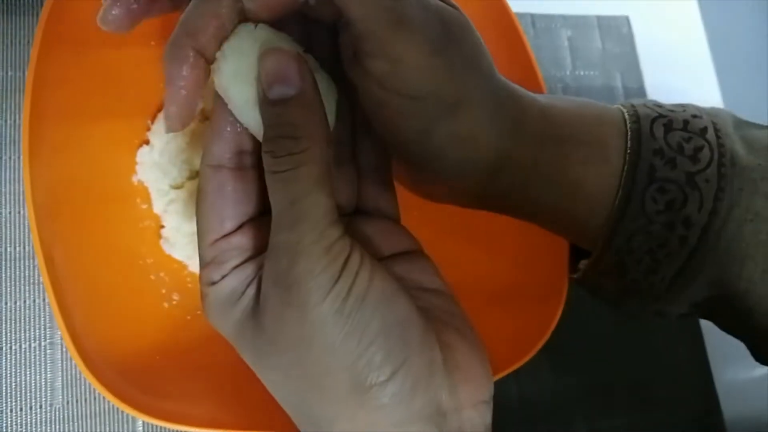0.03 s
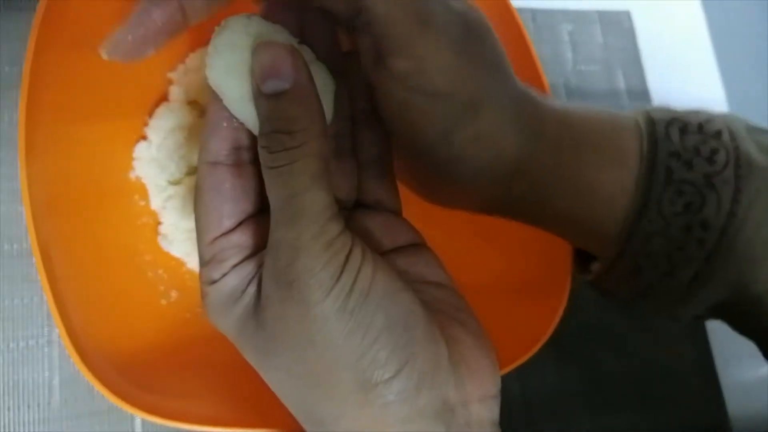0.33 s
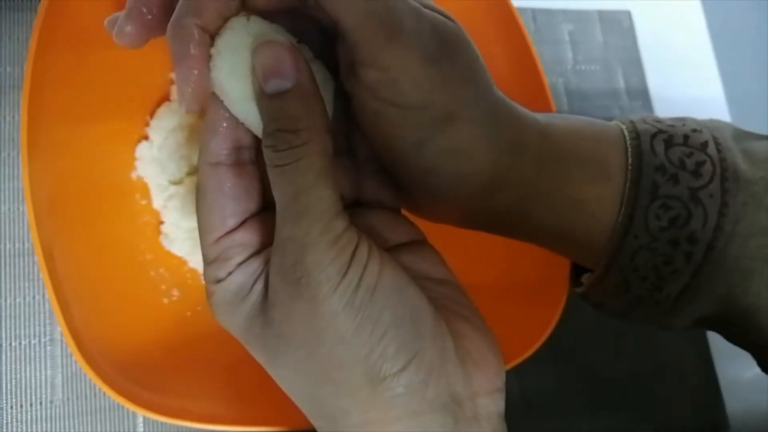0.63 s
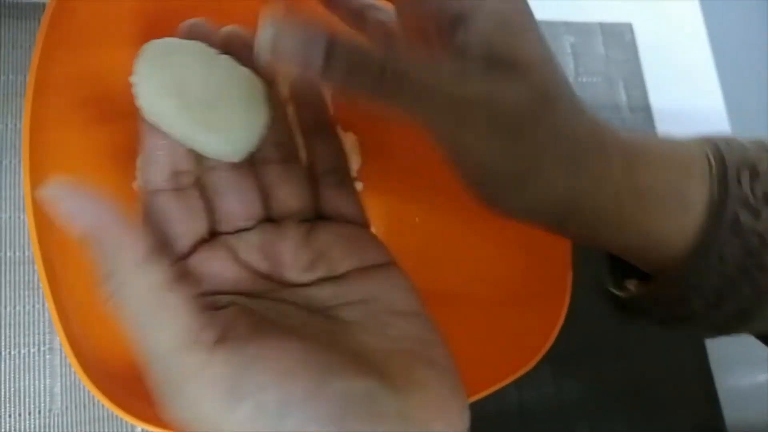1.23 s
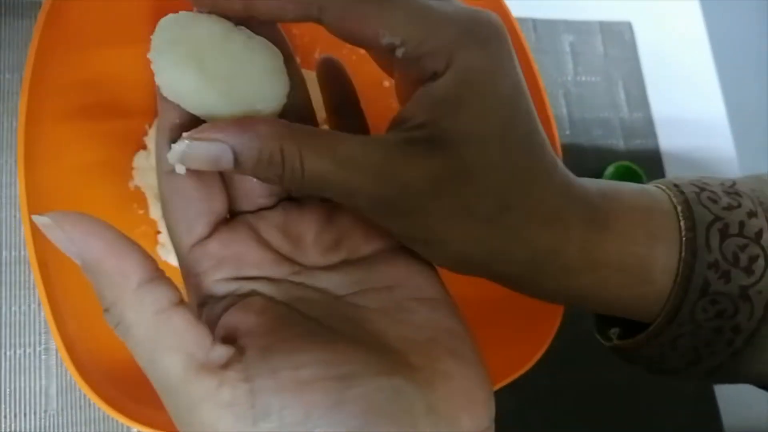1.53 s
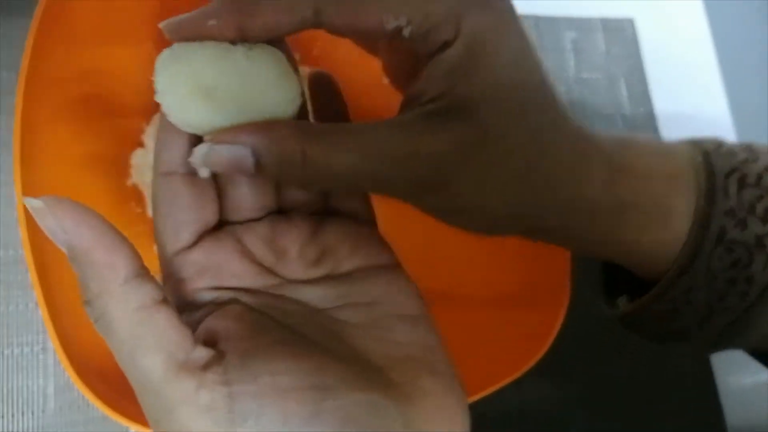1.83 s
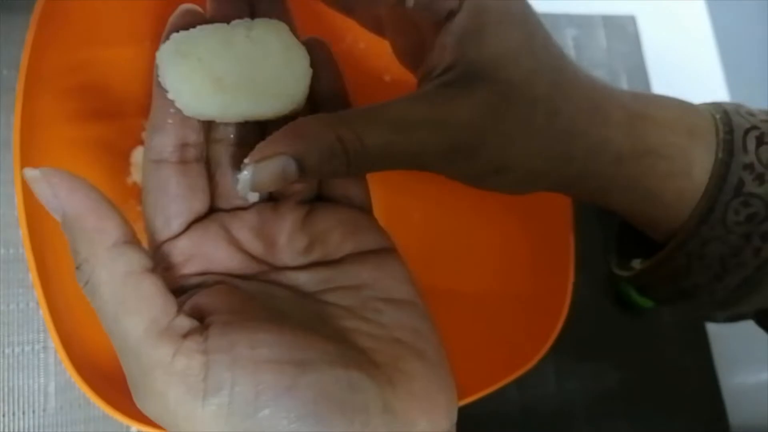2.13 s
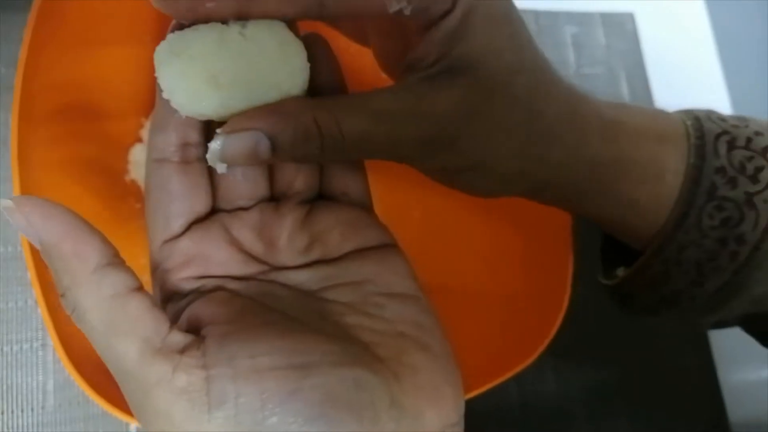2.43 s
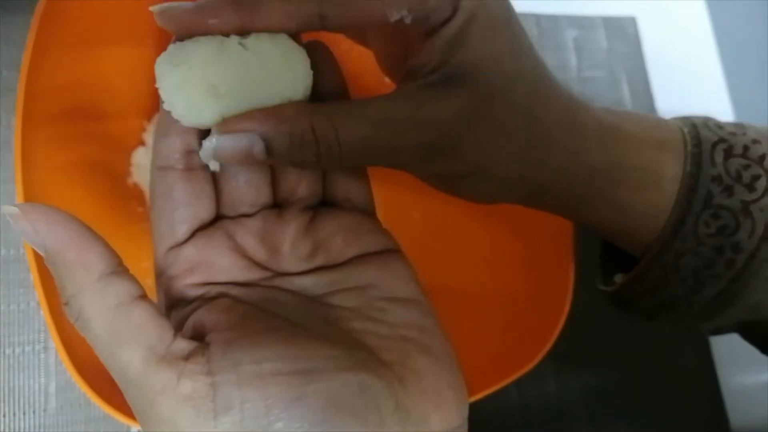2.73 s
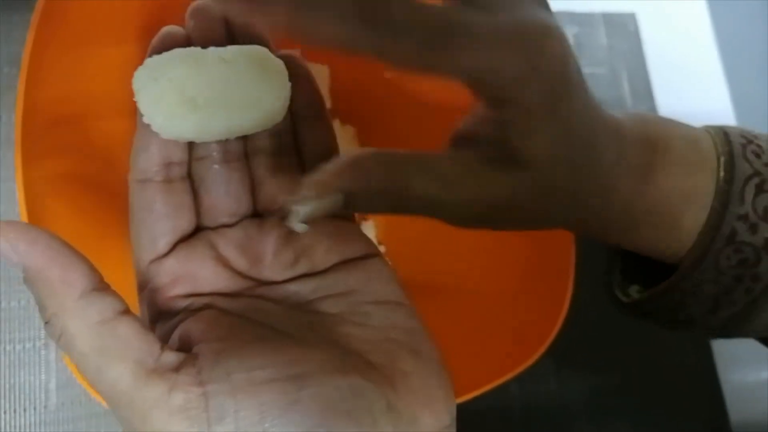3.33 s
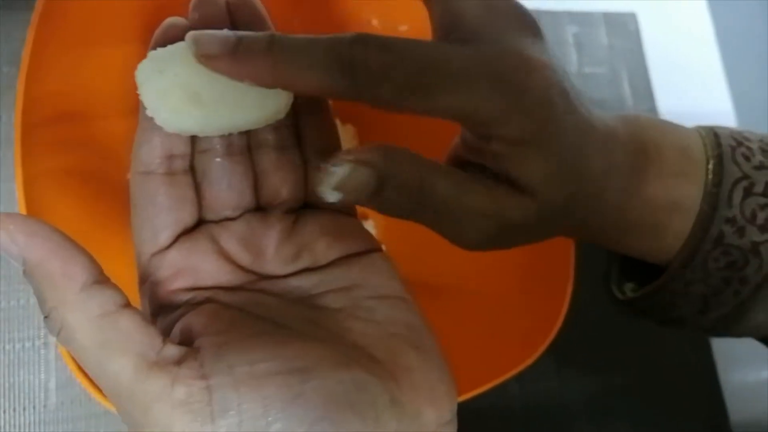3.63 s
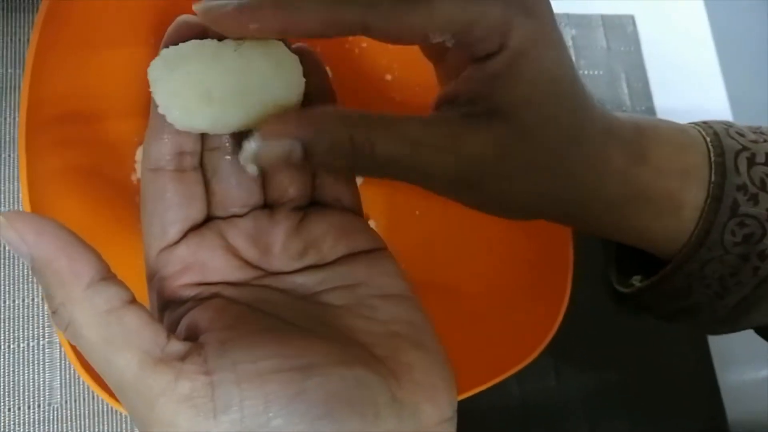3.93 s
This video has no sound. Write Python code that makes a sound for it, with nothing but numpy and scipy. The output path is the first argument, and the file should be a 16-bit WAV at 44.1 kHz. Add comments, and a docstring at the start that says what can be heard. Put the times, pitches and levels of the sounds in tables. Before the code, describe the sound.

Wet clicks come from nearby fingers pressing a soft lump in a quiet kitchen: a brief crackle, a smack, light taps and another smack, then faint tacky ticks and two tiny squeaks, all over a steady low hum.

```python
"""Sticky hands shape a lump of soft mixture over a plastic bowl in a quiet kitchen.
Throughout, a motor, probably a fridge, hums over room rumble, hiss and a faint whine.
After one faint tick, damp skin peels off in a fine crackle (1.1 s). The palm opens with a wet smack
as air pockets pop (1.26 s); the fingers tap down and smack again (1.37 s).
From 1.9 s on, presses give only faint tacky ticks and two thin fingertip squeaks."""
import sys
import numpy as np
from scipy import signal
from scipy.fft import rfft, irfft
from scipy.io import wavfile

SR = 44100
rng = np.random.default_rng(int(sys.argv[2]) if len(sys.argv) > 2 else 0)


def unload_audio(sound):
    """Save the sound as a 16-bit wav file, at the path given as the first command line argument."""
    columns = np.transpose(np.atleast_2d(sound))
    # keep every value between -1 and 1, then stretch to whole-number steps
    steps = np.round(np.clip(columns, -1, 1) * 32767)
    wavfile.write(sys.argv[1], SR, steps.astype(np.int16))


N = 176400
TIME = np.arange(N) / SR
FREQS = np.maximum(np.arange(N // 2 + 1) * SR / N, 1)


def from_db(db):
    """Decibels to gain."""
    return 10 ** (np.asarray(db) / 20)


def at_hz(points):
    """Interpolate (freq_hz, value) rows on a log frequency axis."""
    hz, value = np.transpose(points)
    return np.interp(np.log(FREQS), np.log(hz), value)


def peak_db(hz, width_hz, height_db):
    """One resonance as a bump in the spectrum."""
    return height_db / (1 + (2 * (FREQS - hz) / width_hz) ** 2)


def pan(db):
    """Constant-power stereo gains; positive is left."""
    gains = from_db(np.vstack([db, -db]) / 2)
    return gains / np.sqrt(np.mean(gains ** 2, axis=0))


def unit_energy(x):
    """Scale each channel to energy one."""
    return x / np.sqrt(np.sum(x ** 2, axis=-1, keepdims=True) + 1e-20)


def convolve(x, response):
    """Pass a sound through a response."""
    return signal.fftconvolve(np.atleast_2d(x), np.atleast_2d(response), axes=-1)[:, :N]


def click(colour_db):
    """Minimum-phase click with this spectral shape."""
    cepstrum = irfft(np.log(from_db(colour_db)), N)
    causal = 2 * cepstrum * (TIME > 0) * (TIME < TIME[-1] / 2)
    return unit_energy(irfft(np.exp(rfft(causal)), N)[:SR // 20])


def impulse(start_s, level_db, pan_db):
    """One panned impulse."""
    out = np.zeros((2, N))
    out[:, int(start_s * SR)] = from_db(level_db) * pan(pan_db)[:, 0]
    return out


def narrow_noise(hz, width_hz):
    """Noise in one narrow band, rms one."""
    x = irfft(rfft(rng.standard_normal(N)) * np.exp(-(2 * (FREQS - hz) / width_hz) ** 2), N)
    return x / (x.std() + 1e-20)


def steady_noise(spectrum, balance, correlation):
    """Stereo noise from density and pan tables."""
    mid, side = rfft(rng.standard_normal((2, N)))
    stereo = np.sqrt(1 + correlation) * mid + np.sqrt(1 - correlation) * side * [[1], [-1]]
    return irfft(stereo * from_db(at_hz(spectrum)) * pan(at_hz(balance)), N) * np.sqrt(SR) / 2


def room_rumble():
    """Low room noise, mostly alike on both sides."""
    # rumble spectrum: freq_hz, density_db_per_hz
    spectrum = [(10, -81.5), (25, -69), (36, -73), (56, -73), (70, -65), (86, -73.5), (106, -79),
                (122, -74.5), (142, -81.5), (175, -88.5), (215, -81), (245, -93.5), (275, -84), (320, -91),
                (370, -88), (440, -94), (520, -94), (700, -100), (950, -102), (1300, -112), (3000, -130)]
    # stereo balance: freq_hz, pan_db
    balance = [(30, -3), (80, -1), (150, 0), (300, 1.5), (520, 9), (850, -7.5), (1400, -1)]
    # left-right likeness: freq_hz, correlation
    likeness = [(30, 0.86), (120, 0.96), (250, 0.54), (500, 0.92), (1000, 0.079)]
    return steady_noise(spectrum, balance, at_hz(likeness))


def microphone_hiss():
    """Self-noise, independent in each channel."""
    # hiss spectrum: freq_hz, density_db_per_hz
    spectrum = [(300, -112), (1500, -107.5), (2200, -110), (3200, -110), (3950, -116.5), (4400, -113),
                (5400, -111.5), (7300, -113.5), (9300, -114.5), (10900, -118.5), (11600, -116.5),
                (13900, -116.5), (14700, -111), (15600, -119)]
    # stereo balance: freq_hz, pan_db
    balance = [(2000, 1), (6800, -2), (8300, 3.5), (9500, 4), (11000, 1), (15000, -0.5)]
    return steady_noise(spectrum, balance, correlation=0)


def electrical_whine():
    """Thin high bands that flicker together."""
    # whine bands: pitch_hz, level_db, pan_db
    bands = [(5430, -94, 3), (8040, -89, 24), (9530, -94.5, 15)]
    whine = sum(from_db(db) * pan(pan_db) * narrow_noise(hz, width_hz=66) for hz, db, pan_db in bands)
    flicker_db = 7 * np.tanh(narrow_noise(0, width_hz=22))
    return whine * from_db(flicker_db)


def motor_hum():
    """Motor harmonics wander with its speed; mains lines hold pitch. All waver in level."""
    # motor lines: harmonic, level_db, pan_db
    motor_lines = [(1, -61, -5), (3, -67.5, -3.5), (9, -69.5, -1), (10, -78, 0.5), (11, -76, 11),
                   (12, -82.5, 5.5), (15, -85.5, 7.5), (16, -85.5, -10.5), (18, -80, -3.5),
                   (19, -81.5, 2.5), (20, -85, -14.5), (21, -89.5, 3.5)]
    # mains lines: pitch_hz, level_db, pan_db
    mains_lines = [(101.04, -58.5, 0.5), (149.3, -59.5, -0.5), (303.5, -79, 7.5)]
    motor_hz, wander_hz, waver_db = 48.9, 0.1169, 1.37
    turns = np.cumsum(motor_hz + wander_hz * narrow_noise(0, width_hz=8.09)) / SR
    lines = [(k * motor_hz, k * turns, db, pan_db) for k, db, pan_db in motor_lines]
    lines += [(hz, hz * TIME, db, pan_db) for hz, db, pan_db in mains_lines]
    out = 0
    for hz, cycles, db, pan_db in lines:
        spread_rad = min(hz / 550, np.pi / 2)  # the room shifts higher lines between the sides
        phase = 2 * np.pi * rng.random() + np.array([[.5], [-.5]]) * spread_rad
        level = from_db(db + waver_db * narrow_noise(0, width_hz=11.0))
        out = out + np.sqrt(2) * level * pan(pan_db) * np.sin(2 * np.pi * cycles + phase)
    return out


def reflections(t60_s):
    """Dense stereo tail that falls 60 dB in t60_s."""
    return unit_energy(rng.standard_normal((2, SR)) * np.exp(-np.log(1000) * TIME[:SR] / t60_s))


def kitchen(x):
    """Small-room reverberation, a moment later and duller."""
    # wall response: freq_hz, gain_db
    wall_colour = [(500, -8), (3000, 5), (6500, -1), (10000, -2), (16000, -5)]
    onset_s = 0.002
    tail = reflections(t60_s=0.26) * (1 - np.exp(-(TIME[:SR] / onset_s) ** 2))
    return convolve(x, unit_energy(convolve(tail, click(at_hz(wall_colour)))))


def scatter(x, t60_s=0.03, ring_db=-1.2):
    """Close reflections off palms and bowl add a short ring, keeping the energy."""
    ring_gain = from_db(ring_db)
    return (x + ring_gain * convolve(x, reflections(t60_s))) / np.hypot(1, ring_gain)


def microphone_ports(x):
    """Each port favours its own part of the treble."""
    # port imbalance: freq_hz, pan_db
    balance = [(3000, 0), (5000, -1), (6600, -6), (7700, 1.5), (8800, 17), (10300, 4), (12000, 2),
               (15000, -6)]
    return irfft(rfft(x) * pan(at_hz(balance)), N)


def fingertip_squeaks():
    """Damp fingertips slide: a thin rub swells and fades."""
    # slides: peak_s, half_length_s, pitch_hz, level_db
    slides = [(2.078, 0.034, 6700, -79), (3.985, 0.023, 5260, -75.5)]
    return sum(from_db(db) * np.exp(-((TIME - peak_s) / half_s) ** 2) * narrow_noise(hz, width_hz=650)
               for peak_s, half_s, hz, db in slides)


def grains(rate_per_s, spread_db=-1.5):
    """Random shower of tiny snaps, rms one."""
    sizes = from_db(spread_db * np.minimum(rng.exponential(1, N), 4)) * rng.choice([-1, 1], N)
    shower = sizes * (rng.random(N) < rate_per_s / SR)
    return shower / (shower.std() + 1e-20)


def tacky_skin(room_db=-8.5):
    """Tacky threads snap singly, or in showers that swell until the skin lets go."""
    # thread snaps: start_s, level_db, pan_db, dullness (0-1)
    snaps = [(.178, -45, -6, 0.9), (1.138, -33, 2, 0.15), (1.1466, -36, 4, 0.1), (1.170, -45, 3, 0.1),
             (1.172, -41, 6, 0.1), (1.1897, -38, 4, 0.1), (1.195, -28, 11, 0.1), (1.1992, -24.5, 17, 0),
             (1.1979, -33, 15, 0.1), (1.2043, -21, -6, 0.2), (1.2099, -24.5, 10, 0), (1.894, -44, -2, 0.7),
             (1.912, -48, -4, .8), (2.122, -36, 2, 0.3), (2.902, -48, 6, 0.6), (3.3347, -39, 11, 0.4),
             (3.345, -42.5, 7, 0.7), (3.853, -47.5, 0, 0.8)]
    # skin peels: peak_s, rise_s, fall_s, level_db, dullness (0-1), grains_per_s
    peels = [(1.141, 0.016, .012, -62, 0.5, 560), (1.207, 0.015, 0.0029, -48, 0.1, 2400),
             (1.936, 0.032, 0.02, -67.5, 0.77, 560), (2.915, 0.039, 0.011, -67.5, 0.44, 440),
             (3.340, 0.016, .009, -64.5, 0.5, 1400)]
    # crisp snap spectrum: freq_hz, gain_db
    crisp_colour = [(1000, -35), (2000, -26), (3000, -20.5), (4500, -25.5), (5400, -14), (6600, -6.5),
                    (8000, 1), (9200, -2.5), (11000, -5), (13500, -3), (14800, 1), (16500, -8)]
    # dull snap spectrum: freq_hz, gain_db
    dull_colour = [(1000, -25), (2800, -17), (4000, -8), (5500, -1), (7500, -1), (9200, -5), (11000, -6.5),
                   (16000, -21)]
    releases = [(impulse(start_s, db, pan_db), dullness) for start_s, db, pan_db, dullness in snaps]
    for peak_s, rise_s, fall_s, db, dullness, grains_per_s in peels:
        swell = np.exp(np.minimum((TIME - peak_s) / rise_s, (peak_s - TIME) / fall_s))
        releases.append((from_db(db) * grains(grains_per_s) * swell, dullness))
    crisp = sum(x * (1 - dullness) for x, dullness in releases)
    dull = sum(x * dullness for x, dullness in releases)
    near = convolve(crisp, click(at_hz(crisp_colour))) + convolve(dull, click(at_hz(dull_colour)))
    near = scatter(near)
    return near + from_db(room_db) * kitchen(near)


def finger_taps(room_db=-5.5):
    """Each finger rings the hollow beneath: higher as it closes, lower as they settle."""
    # finger landings: start_s, level_db, pan_db, hollow_hz
    taps = [(1.326, -38, 6, 2970), (1.3369, -26, -3, 2700), (1.3407, -22, 1, 2870),
            (1.3455, -24.5, -3, 2960), (1.353, -29.5, -9, 3100), (1.361, -29, 1, 3320),
            (1.379, -34, 2, 2860), (1.457, -45, 3, 2190)]
    # contact spectrum: freq_hz, gain_db
    colour = [(500, -16), (1100, -22), (1650, -5.5), (2200, -7.5), (2900, -7), (3400, -8.5), (3900, -15),
              (5000, -8), (7000, -6), (8200, -21), (10000, -26), (16000, -26)]
    near = 0
    for start_s, db, pan_db, hollow_hz in taps:
        contact = click(at_hz(colour) + peak_db(hollow_hz, width_hz=560, height_db=15.5))
        tap = convolve(impulse(start_s, db, pan_db), contact)
        near = near + scatter(tap, t60_s=0.038, ring_db=18)
    return near + from_db(room_db) * kitchen(near)


def wet_smacks(right_lag_s=0.000297):
    """Wet air pockets pop open, each with a broad resonance, reaching the left side first."""
    # pops: start_s, level_db, pan_db, pocket_hz, room_db, tilt_db_per_octave
    pops = [(1.2616, -19.5, 7, 7500, -5.5, 1.5), (1.2636, -21, 0, 5000, -15, 1),
            (1.368, -17, -1.5, 7060, -6.5, -2.5)]
    # pop spectrum: freq_hz, gain_db
    colour = [(600, -12), (1500, -13), (2300, -6), (3100, -3.5), (3900, -7.5), (5000, 2), (7000, -2),
              (8900, -2.5), (10500, -4.5), (12800, -11), (14800, -3), (16500, -9)]
    near, room_send = 0, 0
    for start_s, db, pan_db, pocket_hz, room_db, tilt_db_per_octave in pops:
        pocket_db = peak_db(pocket_hz, width_hz=2000, height_db=6.5)
        tilt_db = tilt_db_per_octave * np.log2(FREQS / pocket_hz)
        pop = convolve(impulse(start_s, db, pan_db=0), click(at_hz(colour) + pocket_db + tilt_db))
        near = near + pan(pan_db) * pop
        room_send = room_send + from_db(room_db) * pop
    near[1] = np.interp(TIME - right_lag_s, TIME, near[1])
    return scatter(near) + kitchen(room_send)


def scene():
    """Hands in front of the quiet room."""
    background = room_rumble() + microphone_hiss() + electrical_whine() + motor_hum()
    hands = tacky_skin() + wet_smacks() + finger_taps()
    return background + microphone_ports(hands) + fingertip_squeaks()


def record(dry):
    """Brief fade-in, steep low-pass."""
    fade_s, cutoff_hz = .004, 15750
    low_pass = signal.ellip(12, .1, 70, cutoff_hz, fs=SR, output="sos")
    return signal.sosfilt(low_pass, dry * np.minimum(TIME / fade_s, 1))


dry = scene()
out = record(dry)
unload_audio(out)
```